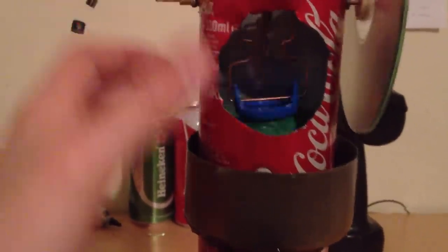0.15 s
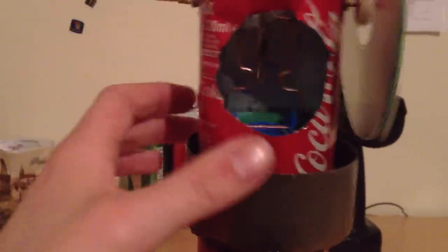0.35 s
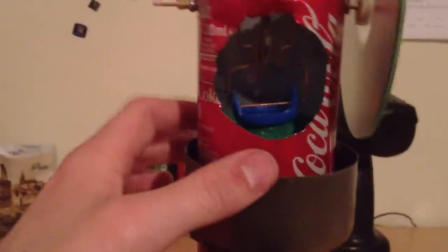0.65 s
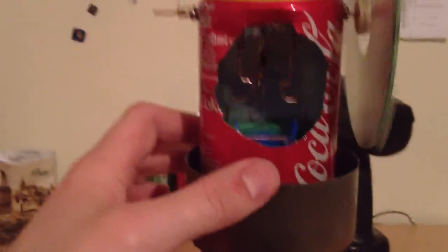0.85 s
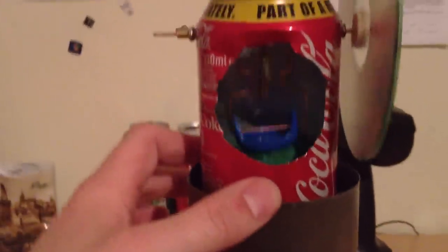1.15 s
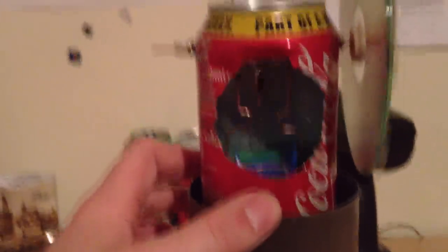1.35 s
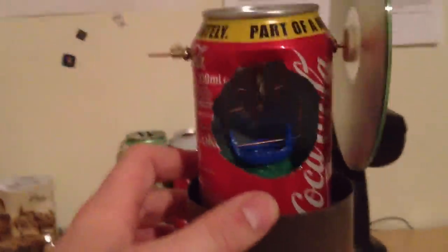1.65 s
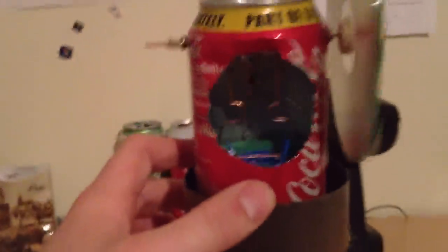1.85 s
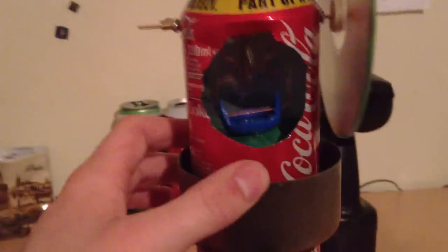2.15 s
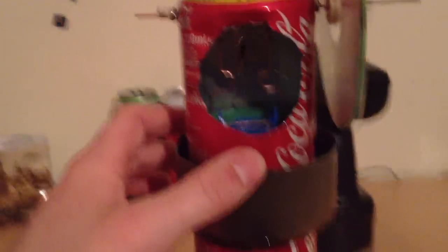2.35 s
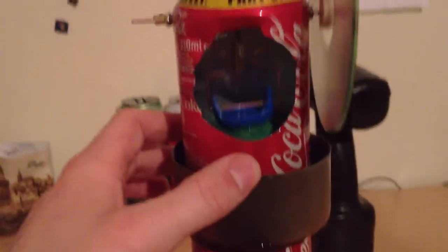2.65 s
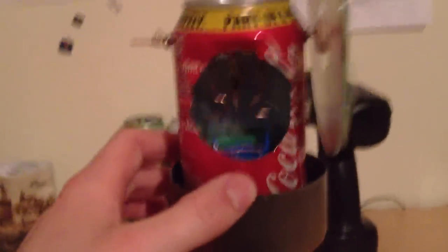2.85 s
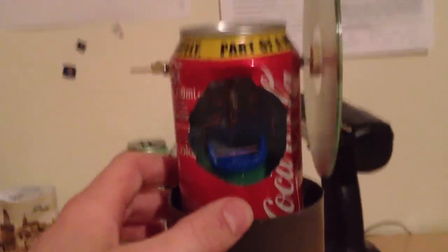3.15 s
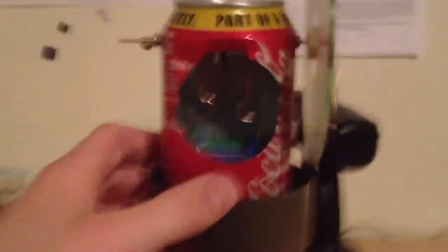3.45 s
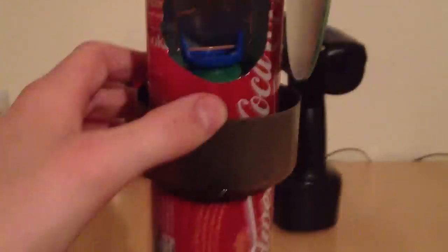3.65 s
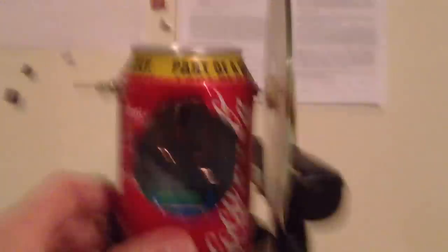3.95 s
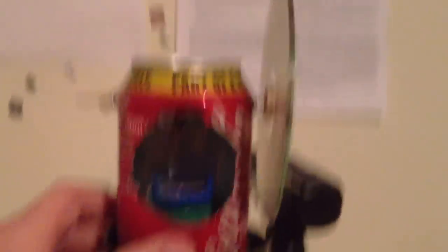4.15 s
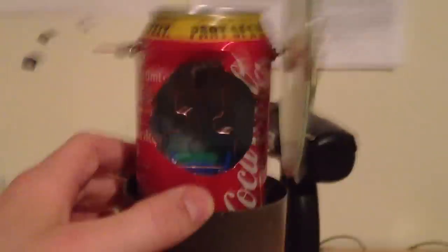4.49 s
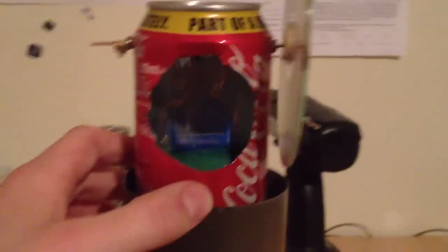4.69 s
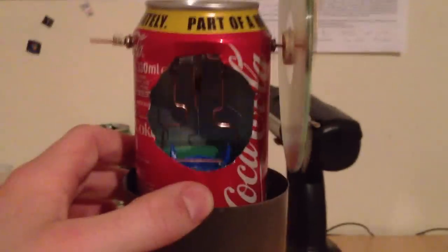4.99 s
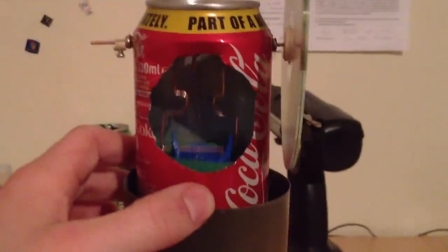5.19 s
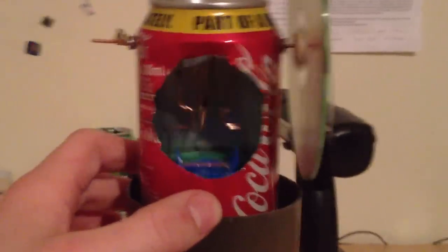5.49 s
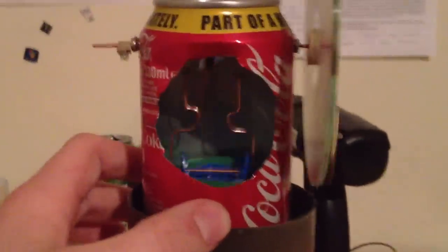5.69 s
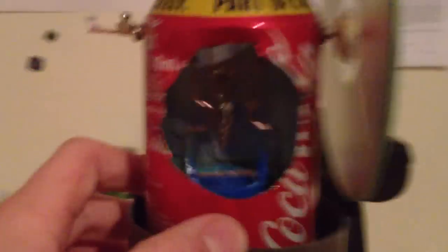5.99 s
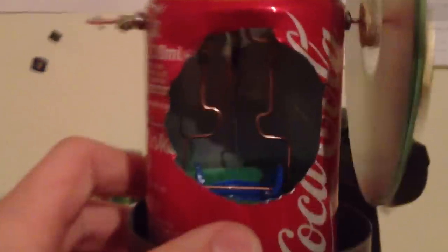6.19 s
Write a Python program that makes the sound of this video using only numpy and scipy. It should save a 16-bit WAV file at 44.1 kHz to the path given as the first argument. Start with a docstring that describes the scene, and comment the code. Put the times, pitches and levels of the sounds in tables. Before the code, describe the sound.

A small homemade engine built from drink cans turns on a table, making hollow, tinny thumps about twice a second. Between the thumps, a wire crank ticks in loose bearings, a rod clacks against the can and other rods scrape softly. Now and then a dry pin gives a tiny, high squeak. The rhythm slows slightly as it goes on. The microphone is close, in a quiet room with faint hiss.

```python
"""Hollow thumps, about two a second, with ticks, clacks, scrapes and now and then a squeak.
They come from a small hot-air engine made of drink cans, turning on a table. Its displacer (the
plunger that moves the air) thumps and bounces in the can, and a rod slaps the can on the way back.
The wire crank ticks in its loose bearings, the rods scrape in their guides and a dry pin squeaks.
Beneath it all lie a quiet room and the hiss of a nearby phone."""
import sys
import numpy as np
from scipy import signal
from scipy.fft import rfft, irfft
from scipy.io import wavfile
from scipy.ndimage import uniform_filter1d

SR = 44100
rng = np.random.default_rng(int(sys.argv[2]) if len(sys.argv) > 2 else 0)


def dump(signal):
    """Clip the signal to [-1, 1] and save it as 16-bit WAV at the path in sys.argv[1]."""
    limited = np.clip(np.atleast_2d(signal).T, -1, 1)
    pcm = np.round(limited * 32767).astype(np.int16)
    wavfile.write(sys.argv[1], SR, pcm)


N = 279153

# tone colour of the steady background: frequency_hz, level_db
BACKGROUND_COLOUR = [(18, -69), (30, -20), (112, -6.5), (233, 9.5), (319, 6.5), (1130, 1.5), (1590, -4.5),
                     (5590, -6.5), (7470, -4), (9710, -11), (13700, -7), (14800, -10.5), (16000, -60)]
# tone colour of metal rubbing or cracking against metal: frequency_hz, level_db
METAL_COLOUR = [(300, 13), (1500, 19.5), (2200, 16), (3200, 10.5), (4400, 18.5), (5700, 9), (7200, 11),
                (9500, 14.5), (13000, 10), (16000, 18.5)]
# tones the can rings with on the table: pitch_hz, level_db, fade_s (time to fall by 60 dB)
CAN_TONES = [(192.5, -10.5, 0.19), (214.7, -5, 0.2), (237.5, -1.5, 0.12), (274.7, 3.5, 0.11),
             (291, -2.5, 0.061), (356.7, -8.5, 0.16), (391, 3.5, 0.11), (520, -18, 0.053), (569, -9, 0.19),
             (636.2, 4.5, 0.076), (744, 1, 0.056), (847, 4.5, 0.053), (957, 2, 0.037), (1058, 6.5, 0.035),
             (1216, 14.5, 0.022), (1387, -14.5, 0.072), (1640, -15.5, 0.02), (2034, -12, 0.074),
             (2420, -4.5, 0.02)]
# tones of the crank wire and thin can wall: pitch_hz, level_db
WIRE_TONES = [(2050, -23.5), (2450, 2.5), (2950, 6), (3740, -21), (4050, -50), (4300, 6.5), (4820, 8.5),
              (5200, -9), (6550, 12.5), (7260, 7.5), (7800, 9.5), (9700, -70), (12100, 10)]
# a dry bearing squeaking: start_s, level_db, pitch_hz, hold_s
BEARING_SQUEAKS = [(0.486, -42.5, 12260, 0.018), (3.928, -45, 9500, 0.0056), (4.4655, -46.5, 9800, 0.005),
                   (5.007, -45.5, 9500, 0.0087), (5.556, -42.5, 9650, 0.016), (5.688, -36, 12000, 0.0084),
                   (6.1026, -40.5, 9700, 0.018)]
# rods sliding through their guides, once each stroke: start_s, level_db, hold_s
ROD_SCRAPES = [(0.0044, -55.5, 0.063), (0.12, -57, 0.088), (0.42, -50, 0.073), (0.567, -54.5, 0.064),
               (0.914, -49, 0.037), (1.099, -51.5, 0.012), (1.412, -45.5, 0.013), (1.573, -57, 0.055),
               (1.881, -52, 0.098), (2.073, -60.5, 0.13), (2.407, -50, 0.044), (2.586, -60.5, 0.089),
               (2.913, -54.5, 0.13), (3.115, -59.5, 0.1), (3.431, -52, 0.095), (3.669, -58.5, 0.087),
               (3.978, -50.5, 0.033), (4.242, -59.5, 0.088), (4.513, -50, 0.033), (4.735, -57.5, 0.11),
               (5.062, -47.5, 0.014), (5.301, -61.5, 0.11), (5.612, -48, 0.028), (5.836, -60.5, 0.17),
               (6.157, -47.5, 0.025)]
# the crank wire ticking in its bearings: start_s, level_db, ring_hz
CRANK_TICKS = [(0.0589, -34, 5500), (0.0824, -44, 4660), (0.1477, -41, 4900), (0.3797, -37, 6400),
               (0.4354, -44.5, 4030), (0.4952, -28.5, 4400), (0.594, -34.5, 2400), (0.6823, -40.5, 2360),
               (0.8777, -30, 6640), (0.886, -34.5, 2720), (0.9318, -36.5, 4550), (0.9871, -33.5, 4800),
               (1.025, -33, 4170), (1.0973, -34, 2740), (1.1274, -37.5, 4580), (1.365, -42.5, 5650),
               (1.4324, -36, 4020), (1.5904, -36, 2900), (1.6244, -40, 2250), (1.686, -44, 2180),
               (1.718, -43.5, 2410), (1.858, -33, 6500), (1.9116, -35.5, 4150), (1.9642, -31, 4670),
               (2.0768, -44, 6610), (2.126, -40.5, 3030), (2.1555, -40.5, 4800), (2.2266, -43.5, 4070),
               (2.365, -36.5, 6000), (2.4208, -41, 4210), (2.4736, -30.5, 4780), (2.6442, -41, 2230),
               (2.7493, -41.5, 2600), (2.8837, -34.5, 6580), (2.9383, -39, 2100), (2.9985, -28, 4280),
               (3.1426, -41.5, 7440), (3.4085, -33, 6600), (3.5244, -30, 3870), (3.6749, -34.5, 4160),
               (3.682, -38, 4500), (3.811, -45, 4260), (3.9373, -33, 7100), (4.0088, -37.5, 4030),
               (4.0566, -30, 3930), (4.2139, -35.5, 4650), (4.2218, -38.5, 4390), (4.4777, -33, 6500),
               (4.598, -30.5, 4850), (4.7572, -36.5, 4560), (5.023, -33.5, 6900), (5.072, -42, 4650),
               (5.0914, -39, 2070), (5.1462, -34.5, 4860), (5.3077, -35, 4260), (5.3728, -38.5, 2420),
               (5.5739, -33.5, 6900), (5.6974, -33, 2940), (5.8544, -36.5, 4900), (5.8621, -35.5, 4760),
               (5.9194, -37.5, 2420), (6.12, -35, 7200), (6.1667, -39, 4100), (6.2317, -41, 2480),
               (6.2668, -34, 2760)]
# the connecting rod slapping the can: start_s, level_db, ring_hz
ROD_CLACKS = [(0.339, -35, 430), (0.437, -25.5, 470), (0.494, -27, 620), (0.817, -26.5, 650),
              (0.945, -42, 880), (0.987, -34, 585), (1.025, -35.5, 630), (1.434, -31.5, 950),
              (1.966, -32.5, 610), (2.435, -37, 860), (2.474, -30.5, 546), (2.954, -33, 830),
              (2.998, -27.5, 594), (3.475, -37.5, 870), (3.498, -33, 352), (3.525, -29.5, 579),
              (3.57, -35.5, 450), (3.628, -37.5, 356), (4.055, -28.5, 660), (4.597, -30.5, 620),
              (5.145, -31, 630), (5.19, -38.5, 636), (5.62, -40, 1110), (5.698, -30.5, 646),
              (6.228, -35, 590), (6.266, -30, 600)]
# soft tugs of the diaphragm (a stretchy skin) as a stroke begins: start_s, level_db
DIAPHRAGM_TUGS = [(0.339, -39), (0.406, -39), (0.905, -36.5), (1.407, -33.5), (1.589, -45), (1.9, -34),
                  (1.922, -37.5), (2.119, -41.5), (2.385, -40), (2.405, -34), (2.639, -46.5), (2.904, -41),
                  (2.927, -33.5), (3.4, -42.5), (3.449, -34.5), (3.579, -39.5), (3.679, -46), (3.937, -39),
                  (3.978, -34.5), (4.22, -39), (4.512, -39), (4.77, -41), (5.032, -43.5), (5.056, -38.5),
                  (5.32, -40), (5.555, -45), (5.608, -40), (5.867, -38.5), (6.166, -40)]
# the displacer hitting the can, a touch and then a landing each turn: start_s, level_db
DISPLACER_BLOWS = [(0.18, -33), (0.206, -20), (0.662, -34.5), (0.679, -21), (1.165, -18), (1.181, -21.5),
                   (1.653, -21), (1.683, -23), (2.156, -24), (2.191, -22), (2.672, -23.5), (2.713, -20),
                   (3.2, -24.5), (3.243, -21), (3.73, -24), (3.775, -21), (4.269, -25.5), (4.313, -22),
                   (4.818, -25), (4.862, -21.5), (5.365, -27), (5.416, -22.5), (5.915, -24.5), (5.964, -22)]
# contacts within one blow, the last out of step so it damps the ring: delay_in_bounces, level_db
BOUNCES = [(0, 1), (0.999, -1), (2.45, -3.5)]

LOW_TONES_BELOW_HZ = 450  # splits the can's low tones from its upper ones
BASS_CUT_HZ, TREBLE_CUT_HZ = 197.4, 15300


def gain(db):
    """Turn decibels into a number to multiply by."""
    return 10 ** (np.asarray(db) / 20)


def fade(t, fade_s):
    """A falling curve that is 60 dB down after fade_s seconds."""
    return np.exp(-np.log(1000) * t / fade_s)


def add(out, start_s, sound, peak_db):
    """Mix a sound in at start_s with the given peak."""
    i = int(start_s * SR)
    part = sound[:N - i]
    out[i:i + len(part)] += part * gain(peak_db) / np.max(np.abs(sound))


def colour(noise, points):
    """Shape noise by (frequency_hz, level_db) points, then scale it to a typical size of 1."""
    hz, db = np.transpose(points)
    freqs = np.arange(len(noise) // 2 + 1) * SR / len(noise) + 1
    shaped = irfft(rfft(noise) * gain(np.interp(np.log(freqs), np.log(hz), db)), len(noise))
    return shaped / np.std(shaped)


def ring(hz, gains, fade_s, size):
    """Struck metal rings with several fading tones; give one fade time for all, or one each."""
    t = np.arange(size) / SR
    return gains @ (np.sin(2 * np.pi * hz[:, None] * t) * fade(t, np.reshape(fade_s, (-1, 1))))


def pass_through(sound, response):
    """Let a sound set something ringing; the response is scaled to an energy of 1."""
    return signal.fftconvolve(sound, response / np.sqrt(np.sum(response ** 2)))[:N]


def background(level_db=-61.5):
    """The quiet room and the phone's hiss make one steady noise."""
    return gain(level_db) * colour(rng.standard_normal(N), BACKGROUND_COLOUR)


def room_echo(sound, level_db=-16.5, fade_s=0.16, band_hz=(343, 4640)):
    """A small room answers with a short, dull echo that has little bass."""
    t = np.arange(int(.5 * SR)) / SR
    tail = rng.standard_normal(len(t)) * fade(t, fade_s) * (t > .004)
    tail = signal.sosfilt(signal.butter(1, band_hz, "band", fs=SR, output="sos"), tail)
    return gain(level_db) * pass_through(sound, tail)


def bearing_squeaks(wobble_hz=300, flutter_db=2.5, rise_s=0.00076):
    """A dry pin sticks and slips, making a thin, wavering tone."""
    out, t = np.zeros(N), np.arange(3000) / SR
    for start_s, level_db, pitch_hz, hold_s in BEARING_SQUEAKS:
        # two smooth random curves, each with a typical size of 1
        wobble, flutter = uniform_filter1d(rng.standard_normal((2, len(t))), size=49) * 7
        tone = np.sin(2 * np.pi * np.cumsum(pitch_hz + wobble_hz * wobble) / SR)
        swell = np.clip(t / rise_s, 0, 1) * fade(np.maximum(t - hold_s, 0), fade_s=0.028)
        add(out, start_s, tone * gain(flutter_db * flutter) * swell, level_db)
    return out


def rod_scrapes(slips_per_s=600, slip_spread_db=3, rise_s=0.011, wire_db=-5, can_db=1):
    """Many tiny slips rattle the wire and, more dully, the can; each stroke swells and fades."""
    slips = (rng.random(N) < slips_per_s / SR) * gain(slip_spread_db * rng.exponential(size=N))
    # every slip is a short puff of noise
    puffs = signal.fftconvolve(slips, fade(np.arange(2000) / SR, fade_s=0.033))[:N]
    grit = puffs * rng.standard_normal(N)
    grit /= np.std(grit)
    t, effort = np.arange(N) / SR, np.zeros(N)
    for start_s, level_db, hold_s in ROD_SCRAPES:
        rise = np.clip((t - start_s) / rise_s, 0, 1)
        effort += gain(level_db) * rise * fade(np.maximum(t - start_s - hold_s, 0), fade_s=0.29)
    hz, db, fade_s = np.transpose(CAN_TONES)
    can = ring(hz, gain(db - 5 * (hz < LOW_TONES_BELOW_HZ)), 0.35 * fade_s, size=5000)
    hz, db = np.transpose(WIRE_TONES)
    tilt_db = -5 * np.log2(hz / 4000)  # higher tones are turned down
    wire = ring(hz, gain(db + tilt_db), fade_s=0.0018, size=2000)
    bright = colour(grit, METAL_COLOUR) + gain(wire_db) * pass_through(grit, wire)
    return effort * bright + gain(can_db) * pass_through(grit * effort, can)


def focus_db(hz, ring_hz, width_octaves):
    """Favour the tones near ring_hz: they lose 6 dB for each width away from it."""
    return -6 * np.abs(np.log2(hz / ring_hz)) / width_octaves


def crank_ticks(scatter_db=3, detune=0.02, shiver_db=-11, crack_db=-3):
    """The wire hits its loose bearing: a crack of noise, a quick chatter, then a faint shiver."""
    out, t = np.zeros(N), np.arange(4000) / SR
    hz, db = np.transpose(WIRE_TONES)
    shaking = fade(t, fade_s=0.024) + gain(shiver_db) * fade(t, fade_s=0.17)
    for start_s, level_db, ring_hz in CRANK_TICKS:
        scatter, hiss = rng.standard_normal(len(hz)), rng.standard_normal(len(t))
        gains = gain(db + focus_db(hz, ring_hz, width_octaves=0.6) + scatter_db * scatter)
        wire = ring(hz * (1 + detune * scatter[::-1]), gains, fade_s=0.006, size=1500)
        chatter = signal.fftconvolve(wire, hiss[::-1] * shaking)[:len(t)]
        crack = colour(hiss, METAL_COLOUR) * fade(t, fade_s=0.025)
        add(out, start_s, chatter / np.max(chatter) + gain(crack_db) * crack / np.max(crack), level_db)
    return out


def rod_clacks(scatter_db=3):
    """The rod slaps the can; the hard contact chatters briefly and sets the can ringing."""
    out, t = np.zeros(N), np.arange(600) / SR
    hz, db, _ = np.transpose(CAN_TONES)
    for start_s, level_db, ring_hz in ROD_CLACKS:
        scatter = rng.standard_normal(len(hz))
        gains = gain(db + focus_db(hz, ring_hz, width_octaves=0.28) + scatter_db * scatter)
        can = ring(hz, gains, fade_s=0.05, size=5000)
        chatter = rng.standard_normal(len(t)) * fade(t, fade_s=0.0032)
        add(out, start_s, signal.fftconvolve(can, chatter), level_db)
    return out


def can_knock(clank_db, bounce_s, push_s, scatter_db=2.67, detune=0.0089, bounce_spread=0.048):
    """One blow: soft bounces drive the can's low tones while loose parts rattle the upper ones."""
    hz, db, fade_s = np.transpose(CAN_TONES)
    low = hz < LOW_TONES_BELOW_HZ
    scatter = rng.standard_normal(len(hz))
    gains = gain(db + scatter_db * scatter)
    pitches = hz * (1 + detune * scatter[::-1])
    direction = (-1.) ** np.arange(len(hz))  # neighbouring wall tones swing opposite ways
    low_ring = ring(pitches[low], -gains[low], fade_s[low], size=8000)
    upper_ring = ring(pitches[~low], (direction * gains)[~low], fade_s[~low], size=8000)

    t = np.arange(1500) / SR
    delays, bounce_db = np.transpose(BOUNCES)
    gap_s = bounce_s * (1 + bounce_spread * rng.uniform(-1, 1))
    pushes = np.zeros(len(t))
    pushes[(delays * gap_s * SR).astype(int)] = gain(bounce_db)
    soft_pushes = np.convolve(pushes, np.hanning(int(push_s * SR) + 3))  # shorter means harder
    loose_hits = (rng.random(len(t)) < .03) * rng.uniform(-.5, .5, len(t))
    rattle = 0.51 * pushes + loose_hits * np.exp(-t / 0.0095)
    thump = signal.fftconvolve(low_ring, soft_pushes)[:8000]
    clank = signal.fftconvolve(upper_ring, rattle)[:8000]
    return thump / np.max(thump) + gain(clank_db) * clank / np.max(clank)


def engine_thumps(hop_after_s=0.023, hop_db=-7.5, lead_s=0.000997):
    """The diaphragm tugs at the can; the displacer touches it, lands hard and hops once more."""
    out = np.zeros(N)
    # each knock starts lead_s earlier than its listed time
    for start_s, level_db in DIAPHRAGM_TUGS:
        tug = can_knock(clank_db=-6, bounce_s=0.0045, push_s=0.0028)
        add(out, start_s - lead_s, tug, level_db)
    for start_s, level_db in DISPLACER_BLOWS[::2]:
        touch = can_knock(clank_db=-8.5, bounce_s=0.0038, push_s=0.0023)
        add(out, start_s - lead_s, touch, level_db)
    for start_s, level_db in DISPLACER_BLOWS[1::2]:
        landing = can_knock(clank_db=-3, bounce_s=0.003512, push_s=0.001)
        add(out, start_s - lead_s, landing, level_db)
        hop = can_knock(clank_db=-9, bounce_s=0.0045, push_s=0.001)
        add(out, start_s - lead_s + hop_after_s, hop, level_db + hop_db)
    return out


def scene():
    """The engine and its echo over the steady background, in one channel."""
    engine = engine_thumps() + rod_clacks() + crank_ticks() + rod_scrapes() + bearing_squeaks()
    # thin cans give off almost no bass
    engine = signal.sosfilt(signal.butter(4, BASS_CUT_HZ, "high", fs=SR, output="sos"), engine)
    return (background() + room_echo(engine) + engine)[None]


def record(dry):
    """The phone cuts off the highest treble."""
    return signal.sosfilt(signal.ellip(10, .2, 60, TREBLE_CUT_HZ, fs=SR, output="sos"), dry)


dry = scene()
out = record(dry)
dump(out)
```